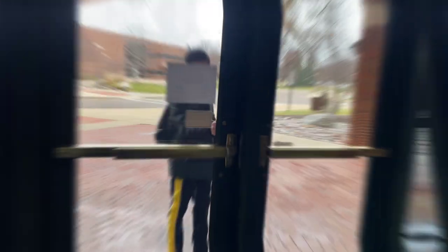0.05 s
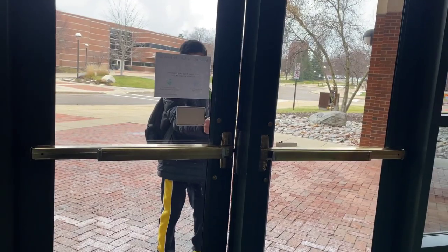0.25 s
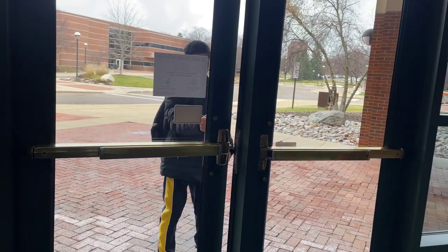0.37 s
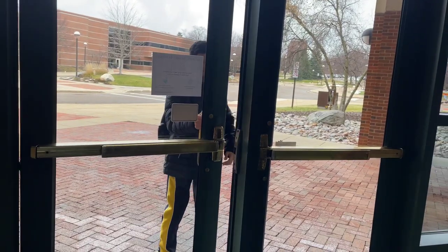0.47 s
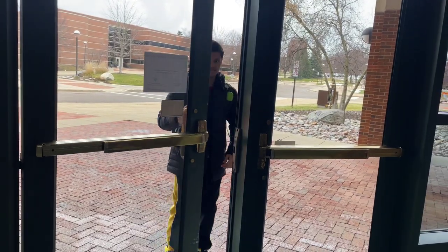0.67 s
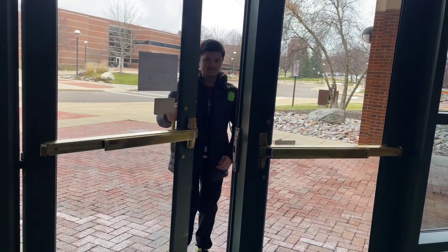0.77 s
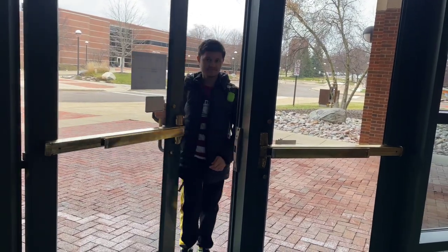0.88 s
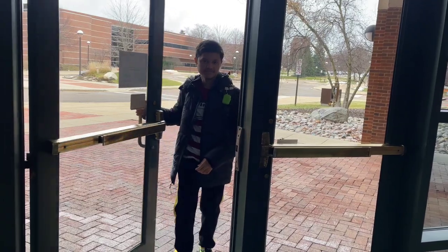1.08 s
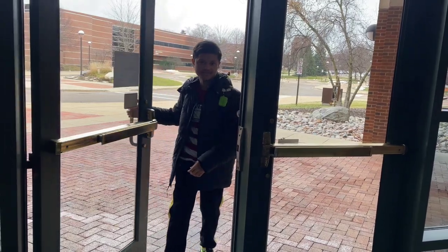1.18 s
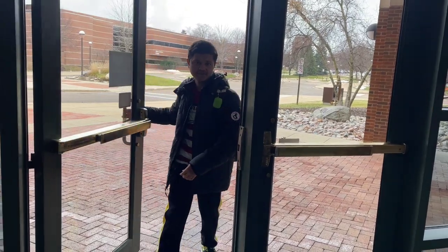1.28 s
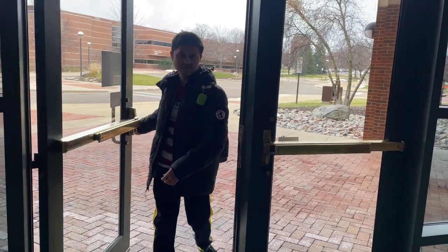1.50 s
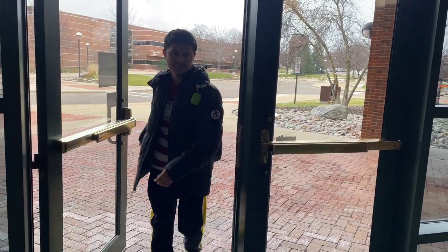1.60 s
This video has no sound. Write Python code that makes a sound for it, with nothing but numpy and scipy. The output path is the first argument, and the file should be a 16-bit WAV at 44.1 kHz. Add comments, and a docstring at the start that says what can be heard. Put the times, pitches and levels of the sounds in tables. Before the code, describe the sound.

A door latch clicks, scrapes and snaps free with a loud metallic clunk, heard from inside an echoing lobby. As the ring fades, the door swings with light ticks, soft outdoor air and a faint jacket rustle.

```python
"""A metal and glass entrance door is pulled open, heard from inside a hard-walled lobby.
The latch clicks, its bolt drags over the strike plate and snaps free with a loud clunk; the door
knocks, and frame and lobby ring on. The pane booms as it leaves its seal, the sweep brushes off the
threshold, and the swinging door shudders with a low hum while hinge, bar and handle tick. Outdoor
air washes in over a low rumble, a jacket rustles, and last come a few soft touches of shoes."""
import sys
import numpy as np
from scipy import signal
from scipy.fft import rfft, irfft
from scipy.io import wavfile
from scipy.ndimage import uniform_filter1d, minimum_filter1d

SR = 44100
rng = np.random.default_rng(int(sys.argv[2]) if len(sys.argv) > 2 else 0)


def unload_audio(sound):
    """Save the sound as a 16-bit wav file, at the path given as the first command line argument."""
    columns = np.transpose(np.atleast_2d(sound))
    # keep every value between -1 and 1, then stretch to whole-number steps
    steps = np.round(np.clip(columns, -1, 1) * 32767)
    wavfile.write(sys.argv[1], SR, steps.astype(np.int16))


N = 72765
TIME, FREQS = np.arange(N) / SR, np.fft.rfftfreq(N, 1 / SR)

# The latch takes up its slack. Each row: start in seconds, level in dB.
CLICKS = [(.1480, -19.5), (.1512, -17.5)]
# The click's bright tone. Each row: frequency in Hz, gain in dB.
CLICK_EQ = [(100, -15), (1300, -9.5), (2500, -1.5), (3200, -3), (5500, -1), (8000, -14), (14000, -18.5)]
# The ping in the click. Each row: pitch in Hz, gain in dB, t60 in seconds.
CLICK_MODES = [(2550, 2, .042)]
# The bolt drags over the strike plate. Each row: time in seconds, level in dB.
DRAG_FADER = [(.15, -46.5), (.175, -45), (.205, -39.5), (.228, -29.5), (.252, -32), (.272, -35),
              (.285, -57.5)]
# The drag's gritty midrange. Each row: frequency in Hz, gain in dB.
DRAG_EQ = [(40, -3.5), (150, -20), (450, 7.5), (800, 4), (1300, -1.5), (2200, 0), (7000, -8), (8500, -15),
           (11000, -12), (14000, -19.5)]
# The sliding bolt sings. Each row: time in seconds, level in dB.
SING_FADER = [(.16, -54), (.177, -38), (.208, -50), (.23, -50)]
# The narrow peak it sings on. Each row: frequency in Hz, gain in dB.
SING_EQ = [(100, -61), (1600, -27), (1790, 0.5), (1860, -0.5), (2020, -26), (5000, -46)]
# The bolt snaps free and chatters. Each row: start in seconds, level in dB.
SNAPS = [(.274, -4), (.2762, 9.5), (.2791, 5.5), (.2803, 11.5), (.2817, 8)]
# The snap's full-range crack. Each row: frequency in Hz, gain in dB.
SNAP_EQ = [(60, -16), (130, 0), (260, -6.5), (600, -3), (850, 0), (2000, -0.5), (3500, 2.5), (4800, 1.5),
           (8000, -5.5), (12000, -6), (14500, -14.5)]
# The bolt's short, high ring. Each row: pitch in Hz, gain in dB, t60 in seconds.
BOLT_MODES = [(3661, -6, 0.025), (4017, -11, 0.036), (4550, -7, 0.035), (6340, -15.5, 0.04),
              (7090, -12, 0.035)]
# The door leaf knocks in its frame. Each row: start in seconds, level in dB.
KNOCKS = [(.2508, -6.5), (.2951, 9), (.2984, 7), (.308, 8), (.3102, -1.5), (.3262, 0.5)]
# The knock's hollow tone. Each row: frequency in Hz, gain in dB.
KNOCK_EQ = [(60, -17.5), (580, -9.5), (760, 0.5), (900, 4), (1080, -5), (1400, 4.5), (4000, -13.5),
            (8000, -23), (14000, -14.5)]
# The body of the leaf. Each row: pitch in Hz, gain in dB, t60 in seconds.
LEAF_MODES = [(135.8, -17, .1), (727, -3, 0.07), (896, -5, 0.085)]
# The long ring of frame, glass and push bar. Each row: pitch in Hz, level in dB, t60 in seconds.
FRAME_MODES = [(136.2, -45.5, 2.4), (328.4, -37.5, 1.62), (705.4, -33, 0.95), (742, -33, .85),
               (825, -31, 0.83), (898, -29.5, .7), (935, -32, 1.6), (1027, -43, 0.58), (1830, -38, 0.61),
               (1937, -26.5, .85), (3430, -30, .31), (3670, -40, 1.1), (3685, -33, 0.93), (4070, -36, 0.39),
               (4590, -30.5, .3), (5230, -29, .42)]

# The swinging door shudders. Each row: time in seconds, level in dB.
SHUDDER_FADER = [(.9, -68), (.99, -41.5), (1.11, -34.5), (1.2, -35), (1.28, -45), (1.46, -39.5),
                 (1.53, -44), (1.57, -70)]
# The shudder's harmonics, fundamental first. Each entry: relative level in dB.
SHUDDER_HARMONICS = [-5.5, -18.5, -20.5, -34]
# The pane booms. Each row: time in seconds, level in dB.
BOOM_FADER = [(.5, -47), (.6, -43.5), (.69, -44), (.715, -55)]
# The door's sweep brushes the threshold. Each row: time in seconds, level in dB.
SWEEP_FADER = [(.822, -83), (.842, -62.5), (.9, -65), (.97, -73)]
# The sweep's thin hiss. Each row: frequency in Hz, gain in dB.
SWEEP_EQ = [(500, -13.5), (4000, 0), (6600, 6.5), (8700, -4), (9700, 3), (11000, -3), (14000, -6)]
# Hinge and bar tick. Each row: start in seconds, level in dB.
TICKS = [(.9922, -27), (1.0112, -28), (1.02, -26), (1.3075, -23), (1.3544, -24), (1.3595, -26),
         (1.4565, -21)]
# The ticks' rounded top. Each row: frequency in Hz, gain in dB.
TICK_EQ = [(100, 11), (2000, 11), (4800, 5.5), (8000, -9), (14000, -19)]
# The loose handle clicks. Each row: start in seconds, level in dB.
HANDLE_CLICKS = [(1.0192, -36), (1.294, -27), (1.3045, -26.5), (1.309, -29)]
# The handle's crisp top. Each row: frequency in Hz, gain in dB.
HANDLE_EQ = [(500, -23), (4500, -12), (8000, -7), (10000, -3), (14000, 2)]

# The jacket rustles. Each row: time in seconds, level in dB.
RUSTLE_FADER = [(1, -93), (1.12, -56), (1.28, -69), (1.36, -52), (1.43, -51), (1.465, -44), (1.52, -48.5),
                (1.58, -53), (1.65, -55.5)]
# The tone of its cloth. Each row: frequency in Hz, gain in dB.
RUSTLE_EQ = [(100, -6), (900, 16), (1600, 5), (2700, 5), (7000, 0.5), (9700, 2), (11500, -10.5),
             (14000, -8)]
# Shoes touch threshold and floor. Each row: start in seconds, level in dB, pitch in Hz.
STEPS = [(1.379, -45, 630), (1.463, -43, 420), (1.553, -44.5, 340), (1.567, -39.5, 175)]
# Their dull scuff. Each row: frequency in Hz, gain in dB.
SCUFF_EQ = [(40, -28), (350, 2), (1000, -9), (3000, -19), (14000, -45)]
# Moving air rumbles. Each row: time in seconds, level in dB.
RUMBLE_FADER = [(.05, -77), (.09, -61.5), (.18, -61), (.25, -47), (.4, -50), (.55, -43), (.62, -39.5),
                (.7, -40.5), (.725, -48), (.9, -46), (1, -43.5), (1.15, -43), (1.3, -44.5), (1.45, -46.5),
                (1.58, -46.5), (1.65, -44.5)]
# The rumble's low end. Each row: frequency in Hz, gain in dB.
RUMBLE_EQ = [(20, -39), (33, -25), (46, 6.5), (70, 0), (100, 2), (150, 2.5), (210, -6.5), (350, -8.5),
             (550, -15.5), (2000, -61)]
# Outdoor air comes through the gap. Each row: time in seconds, level in dB.
AIR_FADER = [(.05, -74.5), (.09, -61), (.3, -44), (.8, -74), (.98, -64.5), (1.07, -50), (1.25, -50.5),
             (1.65, -55.5)]
# The air's soft wash. Each row: frequency in Hz, gain in dB.
AIR_EQ = [(40, -15), (300, -3), (900, -6), (1700, -11), (4500, -19.5), (9300, -21), (11000, -29),
          (14000, -30.5)]

# The tone of the lobby's reverb. Each row: frequency in Hz, gain in dB.
LOBBY_EQ = [(40, -10), (140, -0.5), (250, -1), (330, 6), (500, -6.5), (700, 1), (850, 4.5), (1050, 1.5),
            (1250, 2), (1700, -3), (1920, 1.5), (2150, -1.5), (3250, -1.5), (3670, 2.5), (3900, -1.5),
            (5200, -0.5), (8000, -0.5), (14000, -10.5)]
# The lobby's decay. Each row: frequency in Hz, t60 in seconds.
LOBBY_T60 = [(60, 2.66), (300, 0.94), (900, 1.257), (2000, 1.087), (3700, 0.85), (5500, 0.65), (8000, 0.46),
             (13000, 0.29)]
# Stereo image of diffuse sound. Each row: frequency in Hz, left-right likeness (clipped to -1..1).
DIFFUSE_IMAGE = [(40, .93), (130, 0.7), (260, 0.78), (500, 0.11), (1000, -0.2), (4000, 0.039), (7000, 0.19),
                 (8200, -0.49), (11500, 1), (14000, -0.68)]
# Stereo image of near sound. Each row: frequency in Hz, left-right likeness (clipped to -1..1).
NEAR_IMAGE = [(40, 0.46), (2000, 0.12), (5000, 0.28), (8200, -0.53), (11500, 0.92), (14000, -1.2)]

CLICK_SEND_DB, DRAG_SEND_DB, RING_SEND_DB, KNOCK_SEND_DB, TICK_SEND_DB = 1.5, -3, -6.5, -8.5, -8


def latch(pan_left_db=0.93):
    """The bolt clicks, drags and snaps free, the leaf knocks, and frame and lobby answer."""
    click = blows(CLICKS, CLICK_EQ, decay_s=0.0077)
    drag = friction(fade_out(DRAG_FADER), DRAG_EQ)
    clunk = blows(SNAPS, SNAP_EQ, decay_s=0.0024)
    knocks = blows(KNOCKS, KNOCK_EQ, decay_s=0.0016) + ring(KNOCKS, LEAF_MODES)
    bolt_ring = ring(CLICKS, CLICK_MODES) + ring(SNAPS, BOLT_MODES)
    bolt_ring += friction(fade_out(SING_FADER), SING_EQ)
    reverb = lobby(clunk + amp(KNOCK_SEND_DB) * knocks + amp(CLICK_SEND_DB) * click
                   + amp(DRAG_SEND_DB) * drag + amp(RING_SEND_DB) * bolt_ring)
    mix = click + drag + clunk + knocks + bolt_ring + frame_ring() + reverb
    return mix * amp([[pan_left_db], [-pan_left_db]])


def frame_ring(start_s=0.28, attack_s=0.0064, shake_hz=110):
    """Clusters of close modes beat on after the clunk; loose parts shake the high ones most."""
    t, out = np.maximum(TIME - start_s, 0), np.zeros((2, N))
    for hz, db, t60 in FRAME_MODES:
        detune_hz = 3 + 0.0055 * hz
        shake_radians = 0.55 * hz / 4000
        cluster = 0
        for wobble in shake_radians * wander((4, N), int(SR / shake_hz)):
            pitch = hz + detune_hz * rng.uniform(-0.977, 1)
            cluster += np.sin(2 * np.pi * (pitch * t + rng.random((2, 1))) + wobble)
        out += amp(db) * unit(cluster) * np.exp(-np.log(1000) * t / t60)
    return stereo(out * np.minimum(t / attack_s, 1), DIFFUSE_IMAGE)


def door_shudder():
    """The swinging door vibrates in a low, unsteady hum."""
    phase = wavering_phase(hz=49, depth=0.03)
    hum = sum(amp(db) * np.sin(k * phase + 2 * np.pi * rng.random())
              for k, db in enumerate(SHUDDER_HARMONICS, 1))
    return unit(hum) * fader(SHUDDER_FADER)


def pane_boom():
    """The glass booms on one low note as the door leaves its seal."""
    return unit(np.sin(wavering_phase(hz=134.2, depth=0.011))) * fade_out(BOOM_FADER)


def door_sweep():
    """The sweep brushes off the threshold with a short hiss."""
    return eq(noise(DIFFUSE_IMAGE) * fade_out(SWEEP_FADER), SWEEP_EQ)


def hardware_ticks():
    """Hinge, bar and loose handle tick, with a touch of lobby."""
    ticks = blows(TICKS, TICK_EQ, decay_s=0.0045) + blows(HANDLE_CLICKS, HANDLE_EQ, decay_s=0.003)
    return ticks + amp(TICK_SEND_DB) * lobby(ticks)


def jacket():
    """Cloth rubs in a fine crackle of slips."""
    return friction(fader(RUSTLE_FADER), RUSTLE_EQ, slips_per_s=3000, spread_db=2)


def shoes(rise_s=0.0045, scuff_db=18):
    """Each touch is a soft, damped thump with a little scuff."""
    out = amp(scuff_db) * blows([(s, db) for s, db, hz in STEPS], SCUFF_EQ, decay_s=0.0081)
    for start, db, hz in STEPS:
        t = np.maximum(TIME - start, 0)
        out += amp(db) * t / rise_s * np.exp(1 - t / rise_s) * np.sin(2 * np.pi * hz * t)
    return out


def outdoor_air():
    """Moving air lays a low rumble under the wash from outside."""
    rumble = fader(RUMBLE_FADER) * unit(eq(noise(DIFFUSE_IMAGE), RUMBLE_EQ))
    wash = fader(AIR_FADER) * unit(eq(noise(DIFFUSE_IMAGE), AIR_EQ))
    return rumble + wash


def lobby(send, fill_s=0.05, return_db=4.5):
    """Sound fills a diffuse field that drains band by band, treble first."""
    hz, t, spectra = signal.stft(send, SR, nperseg=256)
    hop_s, power = t[1], (abs(spectra) ** 2).mean(0)
    feedback = np.exp(-2 * np.log(1000) * hop_s / lookup(LOBBY_T60, hz))
    stored = np.array([signal.lfilter([0, 0, hop_s / fill_s], [1, -kept], band)
                       for kept, band in zip(feedback, power)])
    field = signal.stft(resonances(noise(DIFFUSE_IMAGE)), SR, nperseg=256)[2]
    tail = signal.istft(field / field.std() * np.sqrt(stored), SR, nperseg=256)[1][:, :N]
    return amp(return_db) * eq(tail, LOBBY_EQ)


def resonances(x, depth_db=2.8, width_hz=20):
    """Many narrow resonances of glass and metal, at random pitches."""
    ripple = wander(len(FREQS), int(width_hz * N / SR))
    return irfft(rfft(x) * amp(depth_db * np.clip(ripple, -2, 2)), N)


def blows(hits, curve, decay_s):
    """Each blow is a brief rattle of contact: a burst of shaped noise."""
    return eq(noise(NEAR_IMAGE) * hit_envelope(hits, decay_s), curve)


def ring(hits, modes):
    """A struck part rings briefly in each of its modes."""
    out = np.zeros((2, N))
    for hz, db, t60 in modes:
        cycles = hz * TIME + rng.random() + 0.15 * rng.random((2, 1))
        tone = np.sqrt(2) * np.sin(2 * np.pi * cycles)
        out += amp(db) * hit_envelope(hits, t60 / np.log(1000)) * tone
    return out


def friction(gain, curve, slips_per_s=2500, spread_db=-1.5):
    """Rubbing surfaces make dense, tiny slips of uneven size."""
    size = amp(spread_db * np.minimum(rng.exponential(1, (2, N)), 4)) * rng.choice([-1, 1], (2, N))
    slips = size * (rng.random((2, N)) < slips_per_s / SR)
    return eq(unit(stereo(slips, DIFFUSE_IMAGE)) * gain, curve)


def hit_envelope(hits, decay_s):
    """Each hit adds energy, which then drains away."""
    power = sum(amp(2 * db) * np.exp(-2 * np.maximum(TIME - s, 0) / decay_s) * (TIME > s)
                for s, db in hits)
    return np.sqrt(2 * power / (decay_s * SR))


def wavering_phase(hz, depth):
    """Phase of a tone whose pitch wanders by the given share."""
    return 2 * np.pi * np.cumsum(hz * (1 + depth * wander(N, 2500))) / SR


def wander(shape, span):
    """Random drift at rms 1, smoothed over span points."""
    return unit(uniform_filter1d(rng.standard_normal(shape), size=span))


def noise(image):
    """White noise with the given stereo image."""
    return stereo(rng.standard_normal((2, N)), image)


def stereo(x, image):
    """Blends left into right to set their likeness at each frequency."""
    left, right = rfft(x)
    likeness = np.clip(lookup(image, FREQS), -1, 1)
    return irfft(np.array([left, likeness * left + np.sqrt(1 - likeness ** 2) * right]), N)


def eq(x, curve):
    """Minimum-phase filter of unit energy, shaped like the curve."""
    log_gain = np.log(amp(lookup(curve, abs(np.fft.fftfreq(4096, 1 / SR)))))
    taps = np.fft.ifft(np.exp(np.conj(signal.hilbert(log_gain)))).real
    return convolve(x, taps / np.linalg.norm(taps))


def fader(points):
    """Gain along a level curve: silent before it, held after it."""
    s, db = np.transpose(points)
    return amp(np.interp(TIME, s, db)) * (TIME > s[0])


def fade_out(points, release_s=0.032):
    """A fader move that dies away after its last point."""
    return fader(points) * np.exp(-np.maximum(TIME - points[-1][0], 0) / release_s)


def convolve(x, response):
    """Causal convolution, cut to the scene's length."""
    return signal.fftconvolve(np.atleast_2d(x), np.atleast_2d(response), axes=1)[:, :N]


def lookup(points, hz):
    """Reads a table on a log-frequency axis."""
    f, value = np.transpose(points)
    return np.interp(np.log(hz + 1), np.log(f + 1), value)


def amp(db):
    """Decibels to gain."""
    return 10 ** (np.asarray(db) / 20)


def unit(x):
    """Scales to rms 1."""
    return x / np.sqrt(np.mean(x ** 2) + 1e-20)


def scene():
    """The door, the air behind it, and the jacket and shoes of the one who opens it."""
    rustle = jacket()
    door = latch() + door_shudder() + pane_boom() + door_sweep() + hardware_ticks()
    return door + outdoor_air() + rustle + shoes()


def record(dry):
    """A compressor ducks the clunk, holds and lets the tail back up; then soft clip and low-pass."""
    threshold_db, duck_share, attack_s, hold_s = -18, 0.72, 0.002, 0.19
    ceiling, cutoff_hz = 0.85, 14100
    power_db = 10 * np.log10(abs(convolve((dry ** 2).mean(0), np.ones(400) / 400)[0]) + 1e-12)
    excess_db = np.maximum(power_db - threshold_db, 0)
    half_hold = int(hold_s * SR / 2)
    held = -minimum_filter1d(-excess_db, 2 * half_hold + 1, origin=half_hold, mode="nearest")
    fall = 82 * TIME  # the held excess falls back at 82 dB a second
    released = np.maximum.accumulate(held + fall) - fall
    pole = np.exp(-1 / (attack_s * SR))
    duck_db = duck_share * signal.lfilter([1 - pole], [1, -pole], released)
    clipped = ceiling * np.tanh(dry * amp(-duck_db) / ceiling)
    low_pass = signal.firwin(151, cutoff_hz, window=("kaiser", 8), fs=SR)
    return signal.oaconvolve(clipped, low_pass[None], "same", axes=1)


dry = scene()
out = record(dry)
unload_audio(out)
```